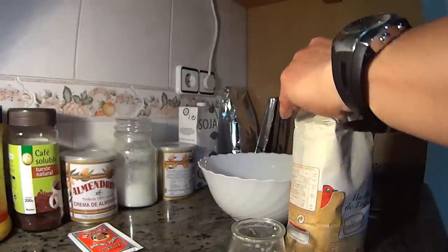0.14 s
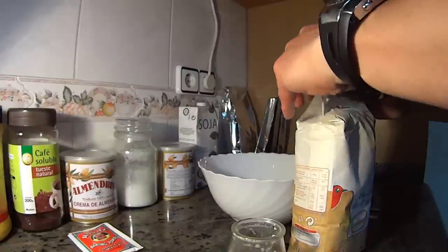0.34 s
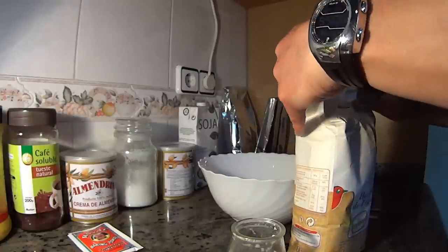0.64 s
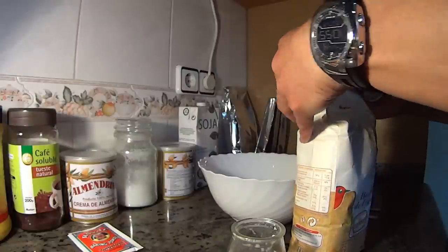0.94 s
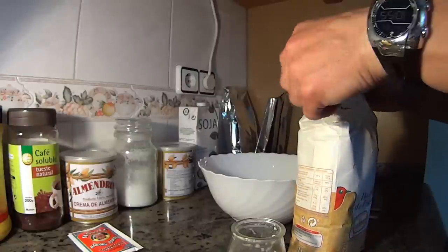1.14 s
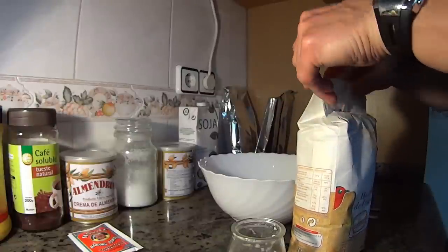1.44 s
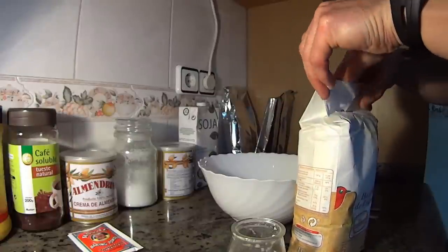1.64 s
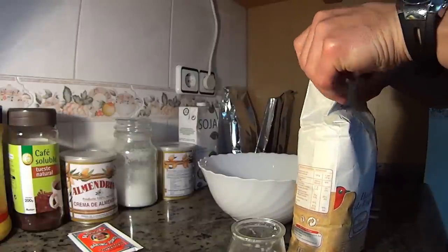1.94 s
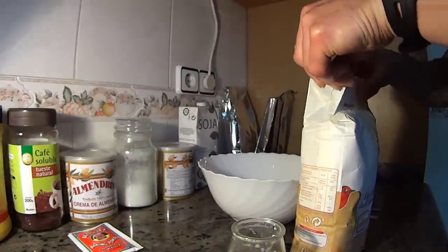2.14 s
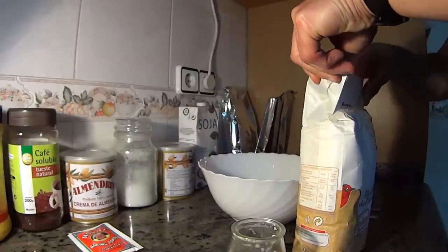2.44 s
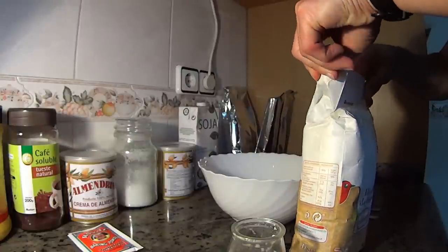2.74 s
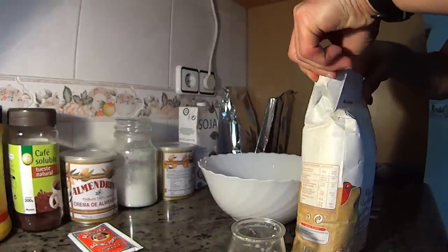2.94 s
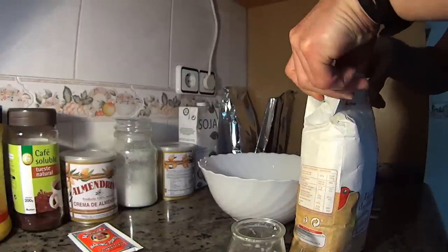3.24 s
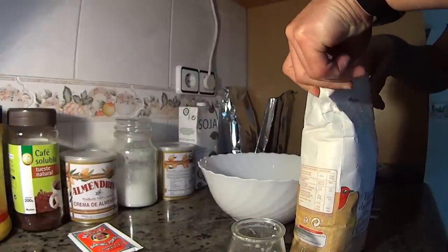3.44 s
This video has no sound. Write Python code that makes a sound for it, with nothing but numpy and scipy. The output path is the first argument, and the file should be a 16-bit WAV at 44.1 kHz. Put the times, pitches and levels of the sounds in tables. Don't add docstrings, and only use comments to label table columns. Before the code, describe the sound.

A full paper bag crinkles with sharp irregular crackles as hands unfold its top, close up.

```python
import sys
import numpy as np
from scipy import signal
from scipy.fft import rfft, irfft, next_fast_len
from scipy.io import wavfile

SR = 44100
rng = np.random.default_rng(int(sys.argv[2]) if len(sys.argv) > 2 else 0)


def digitize_waveform(pressure):
    field = np.atleast_2d(pressure).T
    bounded = np.clip(field, -1, 1)
    quanta = np.round(bounded * 32767).astype(np.int16)
    wavfile.write(sys.argv[1], SR, quanta)


def ratio(d):
    e = np.asarray(d, float) / 20
    return 10 ** e


N = 158760

# (time [s], peak level [dB], pitch [Hz],
# wall boom relative level [dB], aftershock decay T60 [s])
CREASE_SNAPS = [(0.1984, -24, 4840, -34, 0.11), (0.259, -11, 4760, -18, 0.067),
                (0.2801, -22.5, 5640, -11, 0.048), (0.403, -21, 4260, -27, 0.062),
                (0.4504, -18, 5630, -56, 0.055), (0.5105, -24, 5810, -25, 0.069),
                (0.562, -8, 4820, -60, 0.051), (0.601, -14.5, 5670, -34, 0.08),
                (0.6383, -7, 5000, -20.5, 0.085), (0.6794, -5.5, 4800, -31, 0.065),
                (0.7965, -10, 4530, -20.5, 0.059), (0.835, -19.5, 5500, -46, 0.088),
                (0.935, -6.5, 5900, -63, 0.058), (1.0325, -10, 5050, -52, 0.04),
                (1.2513, -26.5, 5100, -40, 0.04),
                (1.4033, -9.5, 5500, -23.5, 0.029), (1.45, -18.5, 3940, -5, 0.036),
                 (1.5957, -10.5, 3670, -39, 0.059), (1.6174, -21.5, 1150, -2, 0.077),
                 (1.7303, -11, 4370, -18, 0.08), (1.7631, -4.5, 5900, -49, 0.05),
                 (1.7798, -23, 5030, -17, 0.053), (1.809, -4, 5620, -51, 0.032),
                 (1.8401, -7.5, 4430, -17, 0.11), (1.8656, -12.5, 6300, -29, 0.11),
                 (1.9593, -8.5, 4240, -30, 0.24), (2.0283, -12.5, 5030, -23, 0.12),
                 (2.0876, -20, 3020, -44, 0.12), (2.1333, -7.5, 3630, -45, 0.038),
                 (2.1578, -26, 1260, -14, 0.025), (2.1829, -5.5, 7140, -18, 0.093),
                 (2.225, -14.5, 4160, -12, 0.017),
                (2.3067, -7, 6340, -23, 0.064), (2.338, -8, 4360, -15, 0.16),
                 (2.5126, -8, 4130, -14.5, 0.044), (2.5562, -11, 5150, -20, 0.021),
                 (2.584, -8.5, 4810, -22, 0.068), (2.6553, -5.5, 3550, -11.5, 0.066),
                 (2.7092, -9, 3580, -13.5, 0.029), (2.7793, -23, 1700, 3.5, 0.048),
                 (2.8339, -9.5, 5000, -37, 0.067), (2.8959, -7.5, 4900, -16.5, 0.12),
                 (3.3597, -21.5, 6300, -39, 0.062), (3.3845, -8.5, 6100, -35, 0.099),
                 (3.4261, -8, 3880, -12.5, 0.071),
                (0.157, -18, 5900, -36, 0.043), (0.2373, -17, 8000, -26, 0.024),
               (0.4548, -17.5, 3120, -40, 0.039), (1.7374, -7, 4300, -32, 0.036),
               (1.7778, -12, 3450, -28, 0.036), (1.8887, -18, 2520, -25, .02),
               (1.9808, -21, 4500, -26, 0.028), (2.0056, -29, 1590, -20, 0.047),
               (2.3243, -16.5, 5740, -18, 0.018), (2.3495, -10, 3150, -22, 0.044),
               (2.3585, -17, 3330, -17, 0.027), (2.411, -38, 2870, -15, .03),
               (2.4328, -28, 5500, -2, 0.036), (2.5705, -18, 1890, -25, 0.02),
               (2.5765, -15, 3200, -9, 0.03), (3.1765, -24, 4350, -20, 0.035),
               (3.1967, -18.5, 5900, -30, 0.064), (3.2874, -14, 5900, -42, 0.033),
               (3.3, -27, 7210, -43, 0.025), (3.3442, -16.5, 8000, -38, 0.02),
               (3.3914, -2, 6200, -41, 0.025), (3.4083, -22, 1700, -26, 0.028)]
# (middle time [s], length [s], rustle level [dB], broad walls relative level [dB])
RUBS = [(0.035, 0.068, -35, -15), (0.14, 0.085, -37, -12), (0.205, 0.012, -27.5, -35),
        (0.267, 0.18, -36.5, -10), (0.361, 0.014, -32.5, 2), (0.513, 0.029, -34.5, -36),
        (0.685, 0.19, -33, -22), (0.861, 0.17, -45.5, -11), (1.001, 0.064, -35, -14),
        (1.16, 0.018, -39.5, -4), (1.265, 0.2, -56, -11), (1.347, 0.014, -35, -15),
        (1.509, 0.11, -31.5, -20), (1.563, 0.082, -54, 14), (1.644, 0.28, -33, -22), (1.873, 0.09, -29, -6),
        (2.236, 0.18, -35.5, -2.5), (2.457, 0.15, -34, -1), (2.627, 0.094, -31, -3), (2.71, 0.12, -39, 3.5),
        (2.836, 0.024, -46.5, 13.5), (2.93, 0.12, -44, 9), (3.058, 0.029, -32.5, -27),
        (3.114, 0.067, -35, -4.5), (3.204, 0.085, -33, -13), (3.307, 0.095, -37, -14),
        (3.385, 0.0063, -30, -23), (3.437, 0.081, -28.5, -1.5), (3.572, 0.14, -38.5, -7)]
# (middle time [s], length [s], level [dB])
EDGE_RUBS = [(.05, .05, -42), (0.525, 0.032, -43), (1.612, 0.04, -37), (2.2, .04, -55), (2.464, 0.051, -47),
             (2.913, 0.038, -32), (3.296, 0.062, -31.5), (3.336, 0.023, -31)]
# (time [s], peak level [dB], pitch [Hz])
BAG_TUGS = [(0.592, -36, 124), (0.944, -21, 620), (1.4, -25, 244), (1.551, -36, 75.4), (1.61, -21, 185),
            (1.769, -20.5, 656), (1.836, -23, 153), (1.954, -18.5, 600), (2.009, -26.5, 132),
            (2.095, -21.5, 623), (2.1, -33.5, 130), (2.179, -37, 150), (2.473, -18, 270), (2.49, -28, 130),
            (2.705, -33, 108), (2.775, -20.5, 590), (2.701, -21, 875), (2.894, -14.5, 744),
            (3.169, -33, 132), (3.419, -15.5, 330)]
# (time [s], level [dB])
BAG_ROCKING = [(0, -60), (.45, -59.5), (.7, -56), (1.3, -60.5), (1.6, -53.5), (2.2, -51), (2.55, -51.5),
               (2.75, -61), (2.95, -54.5), (3.4, -50), (3.6, -51)]
# (time [s], pitch [Hz])
MOUTH_PITCH = [(0.0, 1260), (0.83, 1670), (1.34, 1220), (1.38, 2030), (1.68, 1280), (1.72, 1490),
               (1.99, 1360), (2.22, 1820), (2.33, 1220), (2.5, 1530), (2.95, 1230), (3.39, 1580),
               (3.51, 1150), (3.6, 1460)]
# (frequency [Hz], level [dB])
PAPER_COLOUR = [(300, -2), (1280, -5.5), (2700, -1.5), (5800, 4), (7000, -2), (10600, -9.5), (11400, -18),
                (16000, -21)]
# (frequency [Hz], width [Hz], depth [fraction], negative lifts)
COLOUR_HOLLOWS = [
    (330, 174, 0.46),
    (2840, 200, 0.29),
    (5900, 244, -0.059),
]
# (frequency [Hz], phase [rad])
PORT_LEAD = [(200, 0.4), (600, 1.1), (2200, 1.1), (3300, .5), (6400, .25), (9000, .75), (13000, .3)]
# (frequency [Hz], level [dB])
PORT_BALANCE = [(60, -1.5), (300, -2.6), (1200, -3), (2500, -.8), (5000, -1.2), (9000, -2.3), (14000, -.7)]
# (delay [s], level [dB])
CLOSE_ECHOES = [
    (.0026, -20.5),
    (.0052, -26),
    (.0081, -25),
]
# (left pitch [Hz], right pitch [Hz], width [Hz], level [dB])
CUPBOARD_MODES = [(130, 125, 26, -6), (226.4, 234, 9.8, 4), (403, 435, 14, 1), (678, 685, 55, -3.5)]
# (frequency [Hz], level [dB])
HUM_COLOUR = [(25, 6), (138, 0), (400, -3), (900, -6), (4000, -30)]

SHOCKS_PER_S, SHOCK_DB = 20000, -18
SETTLE_S, SNAP_Q = 0.0062, 2.24
BROAD_DB, BROAD_DB_PER_OCTAVE = 6.9, 14
SPARK_DB, SPARK_HZ, BOOM_DB = -7, 13700, 6
BUCKLES_PER_S, BUCKLE_SPREAD_DB, BUCKLE_CYCLES = 14000, 2.9, 3.0
CLUMP_DB, CLUMPS_PER_S = 1.4, 45
PATCH_DB, PATCHES_PER_S = 3.5, 5.3
REST_DB = -49
WALL_WIDTH_HZ, WALL_DB = 750, -2
EDGE_HZ, EDGE_WIDTH_HZ = 7500, 3800
SAG_HZ, SAG_WIDTH_HZ, SAG_DB = 132, 117, 0.5
PUSH_S, TUG_CYCLES, TUG_DB = 0.006, 1.0, -5.5
ROOM_T60_S, ROOM_DB, ROOM_LOW_HZ, ROOM_CUT_HZ = 0.35, -9.5, 333, 11000
ECHO_SKEW_S, LEFT_DB = 0.00023, -1.6
HUM_DB, HISS_DB = -61, -70
SQUASH, CUTOFF_HZ = 0.2, 16600


def rms_one(x):
    return x / np.sqrt(np.mean(x ** 2) + 1e-20)


def at_hz(points, hz):
    table_hz, values = np.transpose(points)
    return np.interp(np.log(hz + 1), np.log(table_hz), values)


def at_time(points, t):
    return np.interp(t, *np.transpose(points))


def colour(x, spectrum):
    hz = np.arange(2049) * SR / 4096
    low_fall = np.minimum(1, (hz + 1) / spectrum[0][0]) ** 2
    cepstrum = irfft(np.log(ratio(at_hz(spectrum, hz)) * low_fall))
    cepstrum[1:2048] *= 2
    response = irfft(np.exp(rfft(cepstrum[:2049], 4096)))
    return signal.fftconvolve(x, response)[:len(x)]


def drift(rate):
    r = np.exp(-2 * np.pi * rate / SR)
    noise = rng.standard_normal(N + SR)
    return rms_one(signal.lfilter([1], [1, -2 * r, r * r], noise)[SR:])


def resonance(x, hz, width_hz):
    r = np.exp(-np.pi * width_hz / SR)
    poles = [1, -2 * r * np.cos(2 * np.pi * hz / SR), r * r]
    return signal.lfilter([(1 - r * r) / 2, 0, (r * r - 1) / 2], poles, x + 1e-18)


def twice(x, hz, width_hz):
    return resonance(resonance(x, hz, width_hz), hz, width_hz)


def moving(x, hz, width_hz):
    out, states = np.empty(N), np.zeros((2, 2))
    r = np.exp(-np.pi * width_hz / SR)
    for i in range(0, N, 512):
        row = [1, 0, -1, 1, -2 * r * np.cos(2 * np.pi * hz[i] / SR), r * r]
        out[i:i + 512], states = signal.sosfilt([row, row], x[i:i + 512], zi=states)
    return out


def clicks(count, per_s, spread_db):
    chance, size, sign = rng.random((3, count))
    level_db = np.minimum(-np.log(size + 1e-9), 5) * spread_db
    return (chance < per_s / SR) * ratio(level_db) * np.sign(sign - 0.5)


def snaps():
    out, t = np.zeros(N + SR), np.arange(SR // 5) / SR
    for s, db, hz, boom_db, t60 in CREASE_SNAPS:
        onset = np.minimum(1, t / 0.00097)
        shocks = clicks(len(t), SHOCKS_PER_S, spread_db=3.5)
        force = ratio(SHOCK_DB - 60 * t / t60) * shocks * onset
        force[[22, 40, 53]] += [0.35, -1, 0.6] * rng.uniform(0.8, 1.2, size=3)

        ring = rms_one(twice(force * np.exp(-t / SETTLE_S), hz, hz / SNAP_Q))
        broad_db = BROAD_DB + BROAD_DB_PER_OCTAVE * min(0, np.log2(hz / 5500))
        crack = ring + ratio(broad_db) * rms_one(colour(force, PAPER_COLOUR))
        boom = twice(force, at_time(MOUTH_PITCH, s), 2 * WALL_WIDTH_HZ)
        spark = twice(np.eye(40)[0], SPARK_HZ, 6000)

        crack = crack / np.abs(crack).max()
        boom = ratio(boom_db + BOOM_DB) * boom / np.abs(boom).max()
        i = int(s * SR)
        out[i + 30:i + 70] += ratio(db + SPARK_DB) * spark
        out[i:i + len(t)] += ratio(db) * (crack + boom)
    return out[:N]


def swell(s, length, db):
    t = np.arange(N) / SR
    return ratio(db) * np.exp(-(2 * (t - s) / length) ** 2)


def sheets(force):
    grains, dealt = np.zeros(N), rng.integers(0, 18, N)
    for k, hz in enumerate(np.geomspace(400, 15000, 18)):
        ring = twice(force * (dealt == k), hz, hz / BUCKLE_CYCLES)
        grains += ring * ratio(PATCH_DB * drift(PATCHES_PER_S))
    level = ratio(REST_DB) + sum(swell(s, length, db) for s, length, db, _ in RUBS)
    return level * rms_one(colour(grains, PAPER_COLOUR))


def walls(force):
    uneven = force[::-1] * ratio(1.5 * drift(5.1))
    ring = moving(uneven, at_time(MOUTH_PITCH, np.arange(N) / SR), WALL_WIDTH_HZ)
    level = ratio(REST_DB - 8) + sum(swell(s, length, db + wall_db) for s, length, db, wall_db in RUBS)
    return level * ratio(WALL_DB) * rms_one(ring)


def edges(force):
    level = sum(swell(s, length, db) for s, length, db in EDGE_RUBS)
    return level * rms_one(twice(force, EDGE_HZ, EDGE_WIDTH_HZ))


def rustle():
    force = clicks(N, BUCKLES_PER_S, BUCKLE_SPREAD_DB) * ratio(CLUMP_DB * drift(CLUMPS_PER_S))
    return edges(force) + sheets(force) + walls(force)


def sag():
    rumble = resonance(rng.standard_normal(N), SAG_HZ, SAG_WIDTH_HZ)
    rumble = resonance(rumble, SAG_HZ, 160) * ratio(2.2 * drift(15))
    return ratio(at_time(BAG_ROCKING, np.arange(N) / SR) + SAG_DB) * rms_one(rumble)


def tugs():
    out, t = np.zeros(N + SR), np.arange(SR // 5) / SR
    for s, db, hz in BAG_TUGS:
        push = rng.standard_normal(len(t)) * (t / PUSH_S) * np.exp(-t / PUSH_S)
        thud = resonance(resonance(push, hz, hz / TUG_CYCLES), hz, 2 * hz)
        i = int(s * SR)
        out[i:i + len(t)] += ratio(db + TUG_DB) * thud / np.abs(thud).max()
    return out[:N]


def ports(x):
    size = next_fast_len(N)
    hz = np.arange(size // 2 + 1) * SR / size
    turn = np.exp(0.5j * at_hz(PORT_LEAD, hz)) * ratio(at_hz(PORT_BALANCE, hz) / 2)
    spectrum = rfft(x, size)
    return np.array([irfft(spectrum * turn, size)[:N], irfft(spectrum / turn, size)[:N]])


def kitchen(x):
    t = np.arange(SR // 2) / SR
    tail = rng.standard_normal((2, len(t))) * ratio(-60 * t / ROOM_T60_S) * np.minimum(1, t / 0.002)
    band = signal.butter(1, [ROOM_LOW_HZ, ROOM_CUT_HZ], "band", fs=SR, output="sos")
    tail = signal.sosfilt(band, tail)
    tail = ratio(ROOM_DB) * tail / np.sqrt(np.sum(tail ** 2, axis=1, keepdims=True))
    for s, db in CLOSE_ECHOES:
        tail[[0, 1], [int(s * SR), int((s + ECHO_SKEW_S) * SR)]] += ratio(db)
    return signal.fftconvolve(x[None], tail, axes=1)[:, :N]


def cupboard(x):
    out = np.zeros((2, N))
    for left_hz, right_hz, width_hz, db in CUPBOARD_MODES:
        out[0] += ratio(db) * resonance(x, left_hz, width_hz)
        out[1] += ratio(db) * resonance(x, right_hz, width_hz)
    return out


def hum():
    mid, side = (colour(noise, HUM_COLOUR) for noise in rng.standard_normal((2, N)))
    return ratio(HUM_DB) * rms_one(np.array([mid + 0.6 * side, mid - 0.6 * side]))


def scene():
    bag = snaps() + rustle() + sag() + tugs()
    for hz, width_hz, depth in COLOUR_HOLLOWS:
        bag = bag - depth * resonance(bag, hz, width_hz)
    surroundings = kitchen(bag) + cupboard(bag)
    return ports(bag) + surroundings * ratio([[LEFT_DB], [0]]) + hum()


def roll_off(x):
    return signal.sosfilt(signal.butter(12, 16980, fs=SR, output="sos"), x)


def record(dry):
    puff = signal.sosfilt(signal.butter(1, [15, 200], "band", fs=SR, output="sos"), dry ** 2)
    hiss = ratio(HISS_DB) * rng.standard_normal(N)
    top_cut = signal.cheby2(10, 60, CUTOFF_HZ, fs=SR, output="sos")
    return roll_off(signal.sosfilt(top_cut, dry + SQUASH * puff + hiss))


dry = scene()
out = record(dry)
digitize_waveform(out)
```